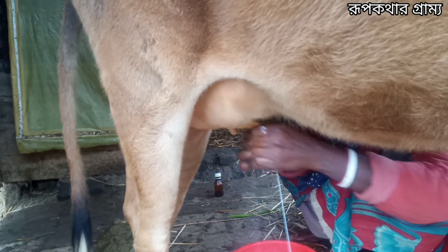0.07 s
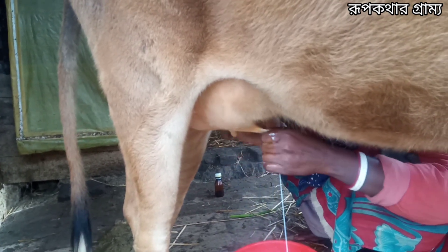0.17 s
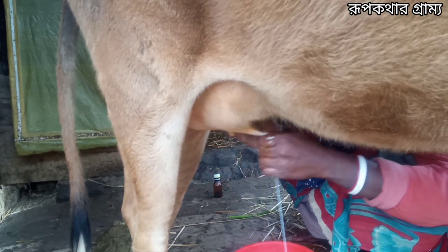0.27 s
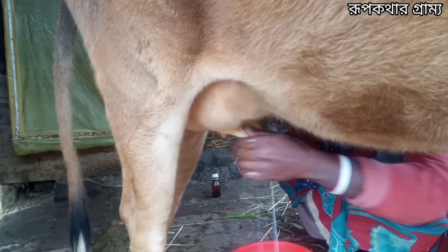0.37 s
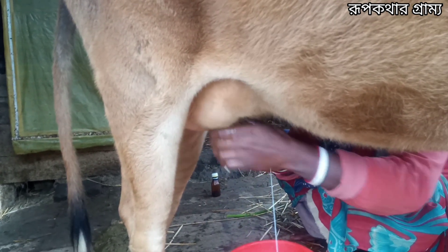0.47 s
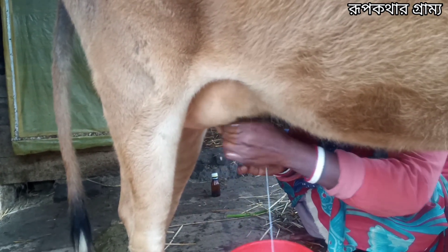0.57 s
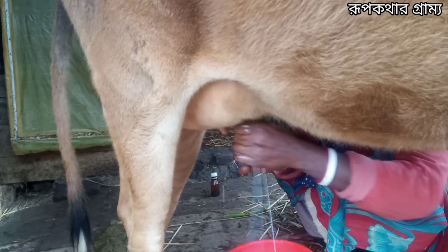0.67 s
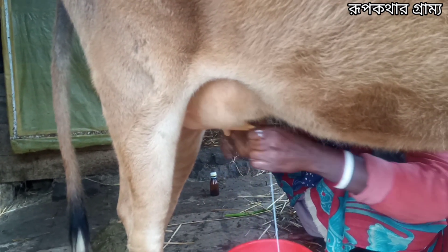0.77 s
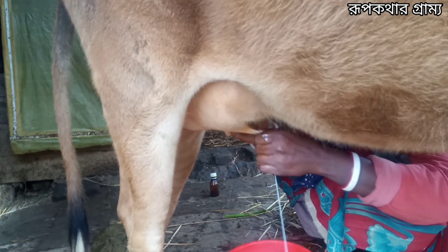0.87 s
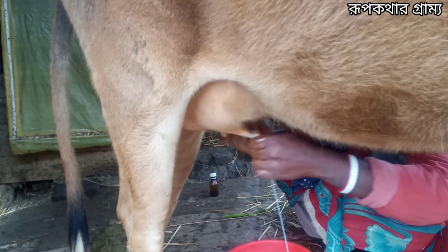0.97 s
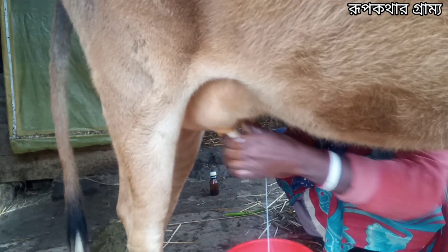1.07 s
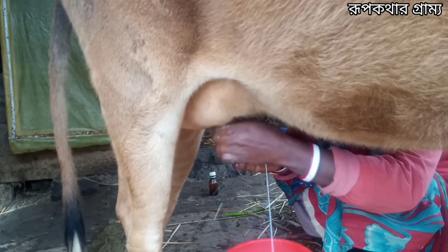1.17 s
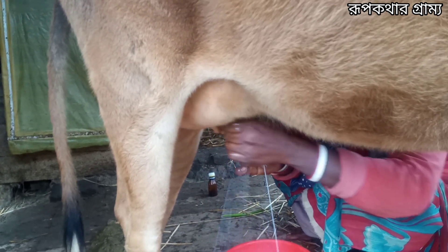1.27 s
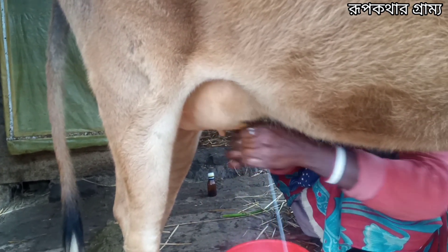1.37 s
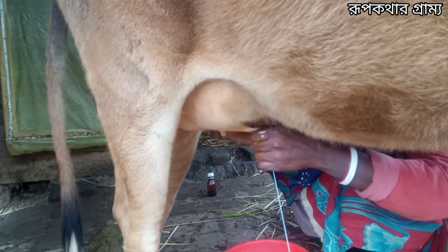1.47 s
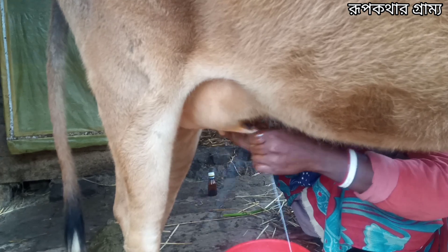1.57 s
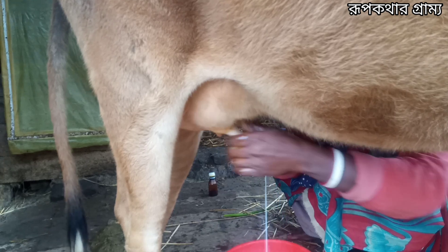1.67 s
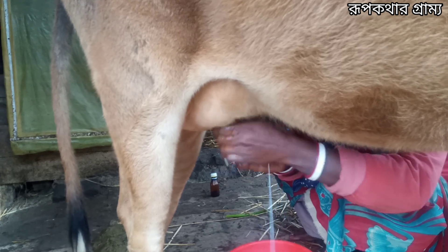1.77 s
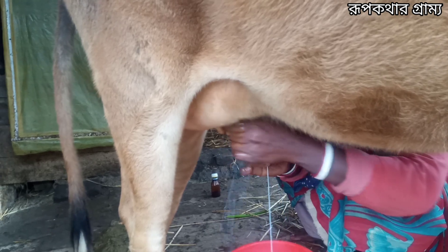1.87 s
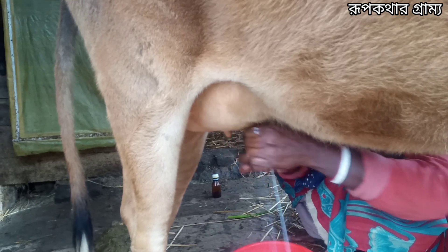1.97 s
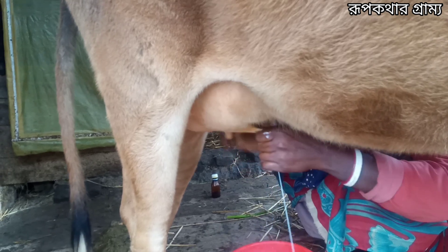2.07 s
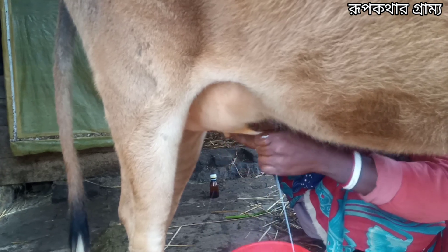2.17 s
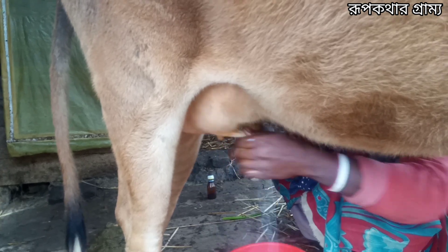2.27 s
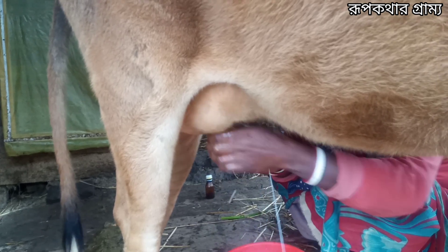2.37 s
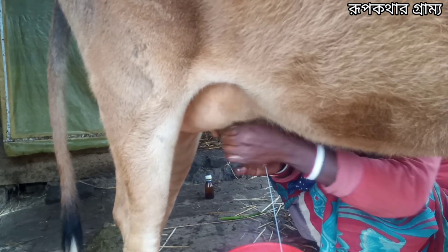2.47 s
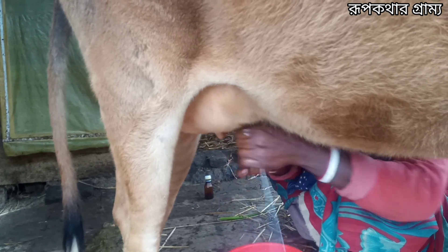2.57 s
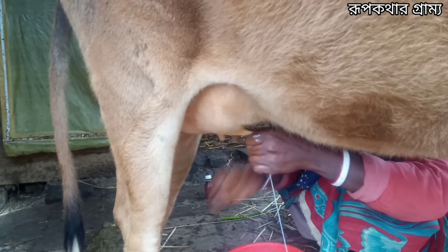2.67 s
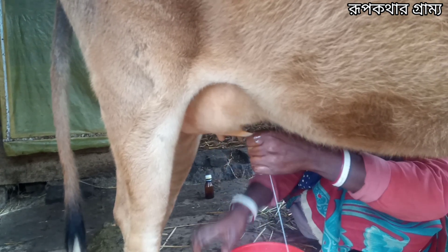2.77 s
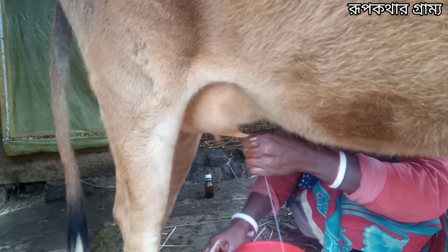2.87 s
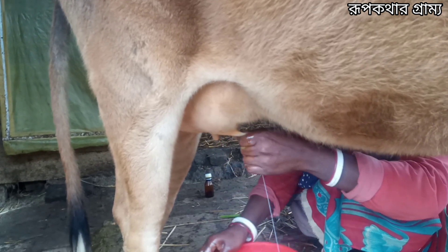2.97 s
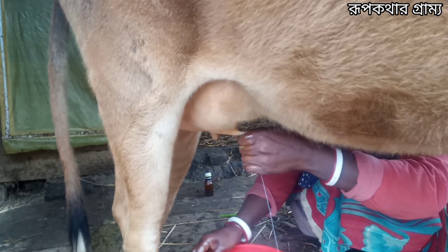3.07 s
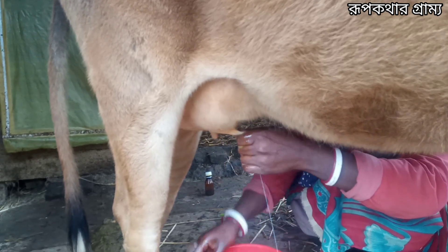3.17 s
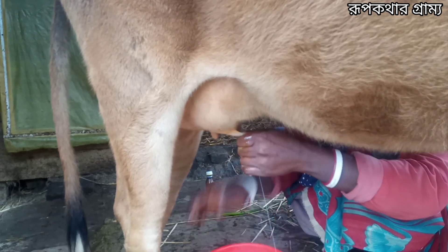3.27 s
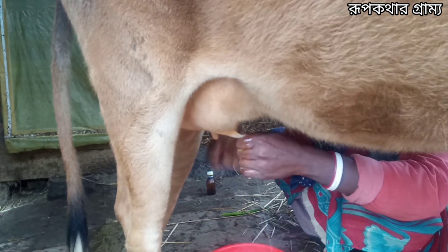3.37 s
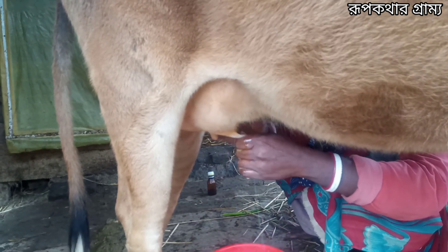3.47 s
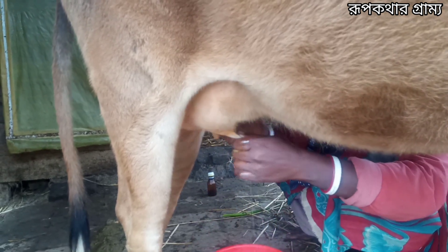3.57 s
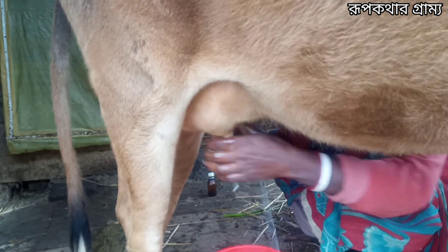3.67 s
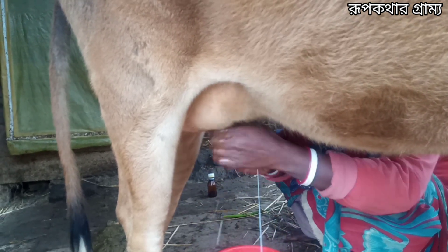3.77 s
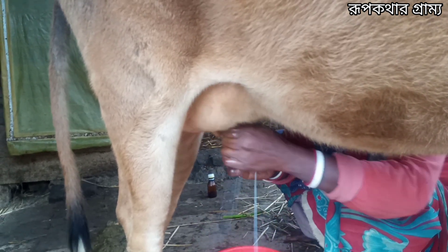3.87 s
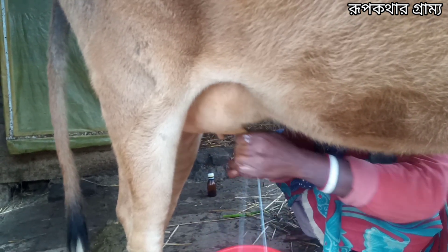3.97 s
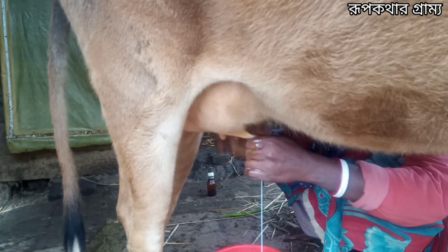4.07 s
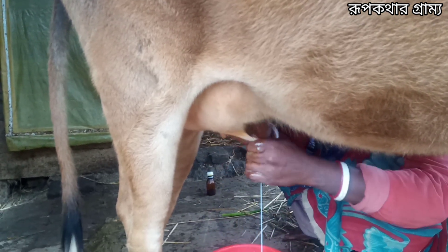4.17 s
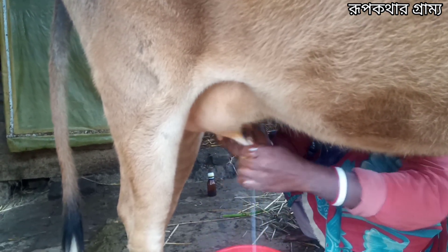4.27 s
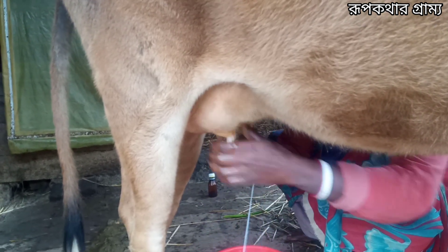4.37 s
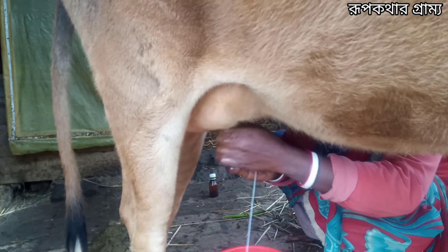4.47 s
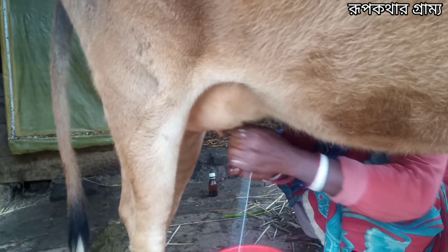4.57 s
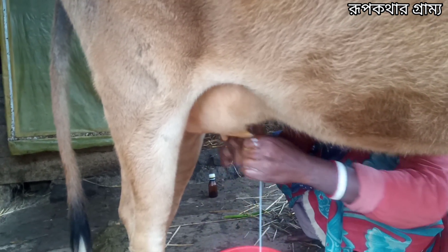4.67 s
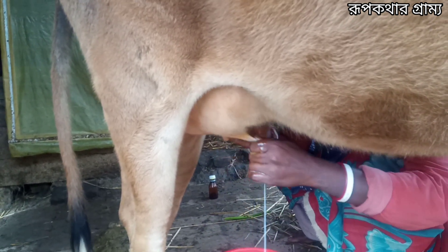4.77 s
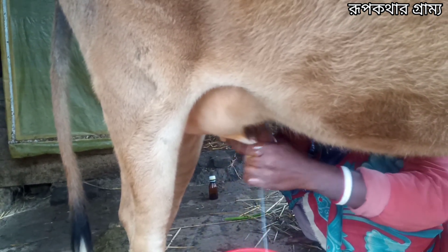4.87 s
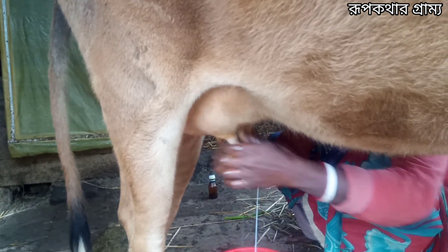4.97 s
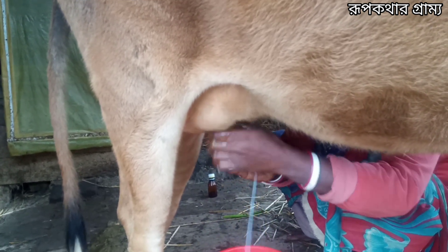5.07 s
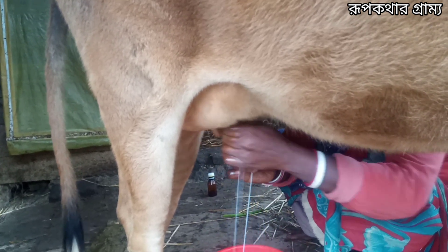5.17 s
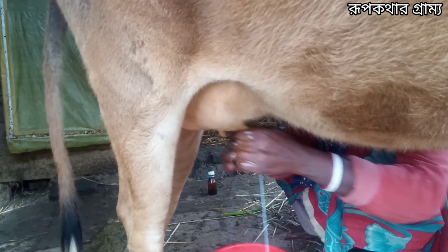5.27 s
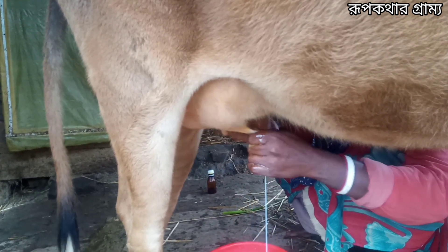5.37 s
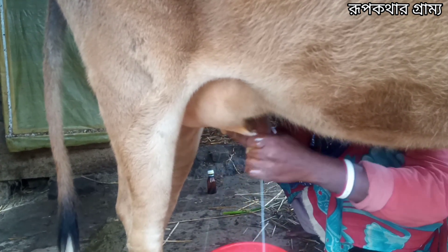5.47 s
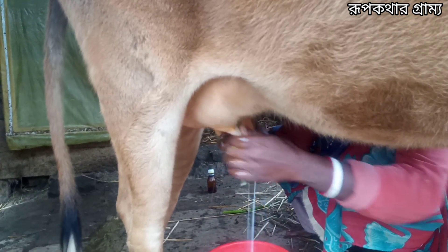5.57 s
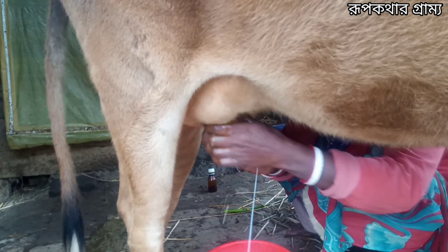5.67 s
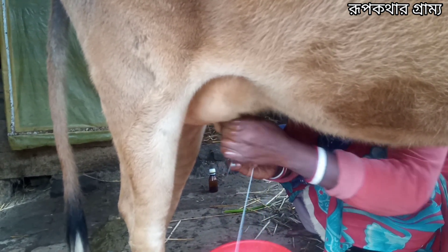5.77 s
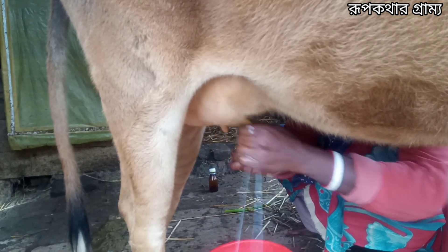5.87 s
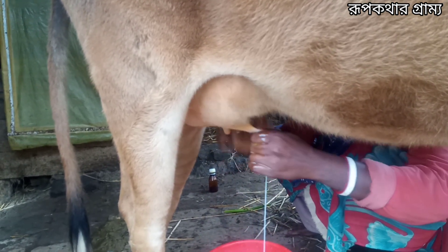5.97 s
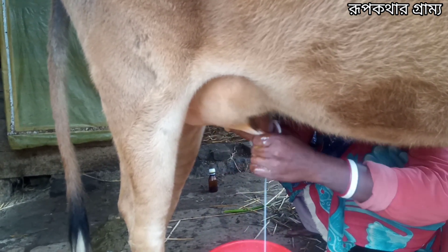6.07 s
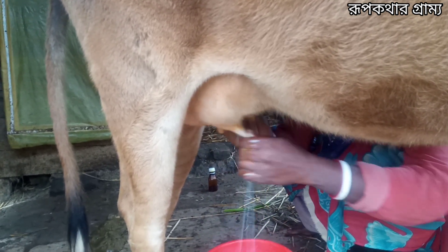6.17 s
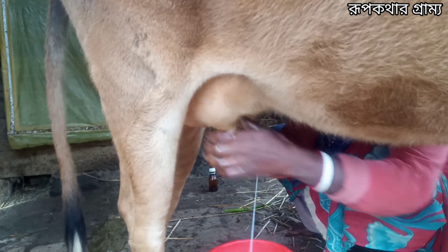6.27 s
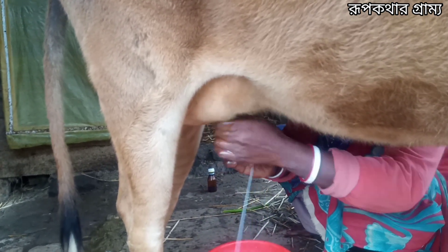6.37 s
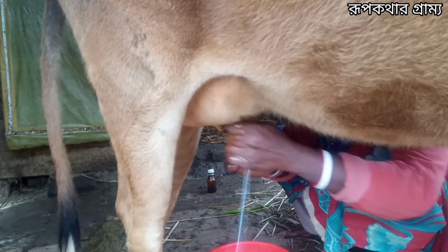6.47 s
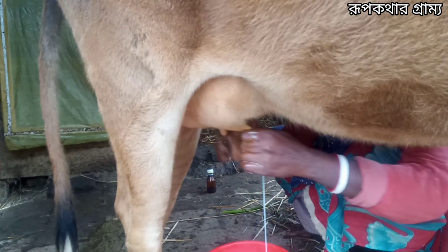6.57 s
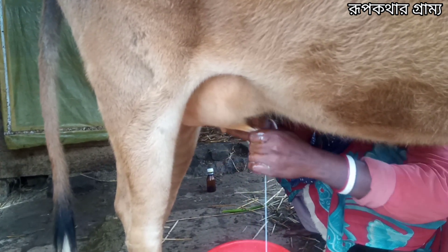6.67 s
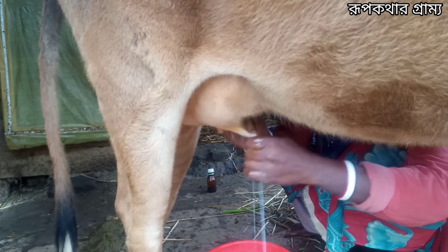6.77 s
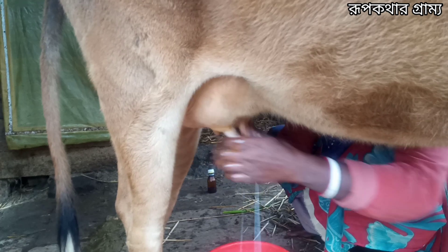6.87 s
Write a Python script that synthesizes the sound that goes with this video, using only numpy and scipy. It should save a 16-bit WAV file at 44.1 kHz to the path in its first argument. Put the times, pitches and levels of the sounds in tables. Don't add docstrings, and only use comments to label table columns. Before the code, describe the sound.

Close phone microphone in a quiet outdoor yard. Milk squirts about three times a second into a froth-filled plastic bucket, each rush foamy, hissing and slightly hollow. Near the middle the jets weaken, a hand knocks the bucket twice, and a few drops tick while a faint bird whistles far off. The steady squirting then returns, with wet slaps and a slight puff of wind late on.

```python
import sys
import numpy as np
from scipy import signal
from scipy.fft import rfft, irfft
from scipy.io import wavfile
from scipy.ndimage import uniform_filter1d

SR = 44100
rng = np.random.default_rng(int(sys.argv[2]) if len(sys.argv) > 2 else 0)


def persist_wave(psi):
    counts = np.round(np.clip(psi, -1, 1) * 32767).astype(np.int16)
    wavfile.write(sys.argv[1], SR, np.atleast_2d(counts).T)


def amplitude_ratio(level_db):
    exponent = np.asarray(level_db, float) / 20
    return 10 ** exponent


N = 305172
T = np.arange(N) / SR

# (time [s], swell [s], squeeze [s], hiss level [dB])
TEAT_JETS = [(-0.106, 0.047, 0.18, -52), (0.074, 0.093, 0.2, -43.0), (0.417, 0.04, 0.2, -38.5),
             (0.735, 0.1, 0.19, -40), (1.044, 0.17, 0.2, -36), (1.373, 0.11, 0.19, -37.5),
             (1.712, 0.03, 0.14, -36), (1.95, 0.21, 0.236, -40.5), (2.352, 0.036, 0.14, -39),
             (2.625, 0.028, 0.028, -51), (2.73, 0.017, 0.13, -53.2), (2.944, 0.097, 0.13, -46.5),
             (3.758, 0.043, 0.21, -46.5), (3.967, 0.048, 0.31, -49.5), (4.378, 0.03, 0.22, -40.5),
             (4.637, 0.08, 0.23, -42.5), (4.992, 0.044, 0.19, -40.5), (5.269, 0.089, 0.2, -40),
             (5.6, 0.14, 0.21, -39.5), (5.934, 0.012, 0.2, -46), (6.257, 0.072, 0.15, -38),
             (6.502, 0.11, 0.27, -41), (6.876, 0.052, 0.037, -42.8)]
# (time [s], level [dB], upper modes re lower [dB])
BLOWS = [
    (2.9526, -31.5, -10),
    (2.973, -16, -10),
    (2.9777, -29.5, 5),
    (3.2343, -20.5, -3.5),
]


def evened(x):
    return x / np.sqrt(np.mean(x ** 2) + 1e-20)


def add(mix, s, sound):
    part = mix[round(s * SR):][:len(sound)]
    part += sound[:len(part)]


def coloured(x, points):
    hz, db = np.transpose(points)
    bins = np.fft.rfftfreq(len(x), 1 / SR)
    gain = amplitude_ratio(np.interp(np.log(bins + 1), np.log(hz), db))
    return evened(irfft(rfft(x) * gain, len(x)))


def resonate(x, hz, width):
    turn = np.exp(2j * np.pi * np.cumsum(hz * np.ones(len(x))) / SR)
    r = np.exp(-np.pi * width / SR)
    return 2 * (turn * signal.lfilter([1 - r], [1, -r], x / turn + 1e-18)).real


def ring(x, modes):
    out = np.zeros(len(x))
    for k, (hz, width, db) in enumerate(modes):
        near, far = np.exp((2j * hz - width * np.array([1, 1.3])) * np.pi / SR)
        gain = (1 - abs(near)) * (1 - abs(far))
        out += (-1) ** k * amplitude_ratio(db) * signal.lfilter([gain], np.poly([near, far]), x).real
    return evened(out)


def flutter(per_s):
    return evened(signal.lfilter(*signal.butter(1, 2 * per_s / SR), rng.standard_normal(N)))


def patchy(x, patch_db, size=(4, 14)):
    z = signal.stft(x, nperseg=512, noverlap=384)[2]
    field = rng.standard_normal(z.shape[::-1]).T
    field = uniform_filter1d(field, size=size[0], axis=0)
    field = evened(uniform_filter1d(field, size=size[1], axis=1))
    return evened(signal.istft(z * amplitude_ratio(patch_db * field), nperseg=512, noverlap=384)[1][:N])


def squeezes(rows, gain_db, follow=1.0, onset=0.65, sag_db=63, cut_db=340, drip=0.37, drip_db=25, head_db=0):
    usual_db, head_s = -25, 0.017
    power = np.zeros(N)
    for (s, swell, length, db), wet in zip(rows, drip * np.ones(len(rows))):
        u = np.maximum(T - s, 0)[max(round(s * SR), 0):][:SR]
        after = np.maximum(u - length, 0)
        share = np.clip(wet, 0, 1)
        shape = np.minimum(u / swell, 1) ** onset * amplitude_ratio(-sag_db * np.maximum(u - swell, 0))
        shape = shape * ((1 - share) * amplitude_ratio(-cut_db * after) + share * amplitude_ratio(-drip_db * after))
        shape = shape * amplitude_ratio(head_db * np.clip((head_s - u) / 0.002, 0, 1))
        level = amplitude_ratio(gain_db + usual_db + follow * (db - usual_db))
        add(power, max(s, 0), (level * shape) ** 2)
    return np.sqrt(power)


def bubbles(lo_hz, hi_hz, per_s, cycles, spread_db, count=24):
    out = np.zeros(N)
    t = np.arange(700) / SR
    for hz in np.geomspace(lo_hz, hi_hz, count):
        tone = np.sin(2 * np.pi * hz * t * (1 + 0.01255 * hz * t))
        ping = tone * np.exp(-t * hz / cycles) * np.sqrt(hz)
        hit, size = rng.random(N), rng.exponential(1, N)
        train = (hit < per_s / count / SR) * amplitude_ratio(spread_db * np.minimum(size, 4))
        out += signal.oaconvolve(train, ping)[:N]
    return evened(out)


def droplets(share, spread_db):
    size_db = spread_db * np.minimum(rng.exponential(1, N), 6) * (rng.random(N) < share)
    return patchy(rng.standard_normal(N) * amplitude_ratio(size_db + 3.83 * flutter(127)), 3.8)


def milk():
    # (time [s], swell [s], squeeze [s], peak level [dB], aim: bucket air re froth [dB])
    full_jets = [(-0.101, 0.025, 0.091, -23, 0), (0.072, 0.19, 0.23, -31, 0.5),
                 (0.447, 0.073, 0.27, -22.5, -6), (0.753, 0.12, 0.17, -25.5, -0.5),
                 (1.098, 0.062, 0.19, -20.5, -2), (1.373, 0.13, 0.19, -28, -5.5),
                 (1.737, 0.037, 0.22, -20.5, -4.5), (1.991, 0.21, 0.17, -26.5, -8),
                 (2.366, 0.046, 0.18, -26.5, 0.5), (2.617, 0.052, 0.047, -40.5, -10),
                 (2.717, 0.13, 0.098, -34, -10.5), (2.958, 0.013, 0.11, -36.5, -7),
                 (3.761, 0.096, 0.2, -32, -0.5), (4.012, 0.14, 0.3, -30.5, 0.5),
                 (4.401, 0.14, 0.13, -23, -10.5), (4.686, 0.1, 0.18, -25.5, -4),
                 (5.011, 0.045, 0.15, -19, -5), (5.295, 0.13, 0.23, -29.5, -0.5),
                 (5.631, 0.075, 0.16, -22, -8), (5.967, 0.1, 0.18, -24, -4),
                 (6.298, 0.062, 0.11, -20, -10.5), (6.589, 0.067, 0.21, -23.5, -2),
                 (6.893, 0.065, 0.042, -28.5, -3.5)]
    # (time [s], swell [s], squeeze [s], peak level [dB], air re froth [dB])
    spurts = [(4.415, 0.018, 0.043, -32.5, -13), (4.655, .02, .04, -45, 0), (5.225, 0.012, 0.027, -42, -10),
              (5.69, .02, 0.034, -22, -22), (5.775, .015, 0.039, -27.5, -20),
              (5.935, .01, 0.035, -45.5, -7), (6.06, 0.03, 0.026, -25.5, -9),
              (6.515, 0.033, 0.076, -42.5, -14)]
    strike_db = [-39, -43, -35, -36, -35.5, -65, -37.5, -65, -39, -50, -54, -67, -47, -39.5, -42.5, -44,
                 -42.5, -39.5, -43, -46.5, -45.5, -40.5, -36.5]
    jet_bubble_hz = [2840, 2740, 2670, 2750, 2560, 2600, 2600, 3070, 2980, 3030, 2170, 2600, 2850, 3040,
                     2700, 2660, 2380, 2900, 2650, 2730, 2600, 3100, 3060]
    # (time [s], frequency [Hz])
    column = [(0, 1135), (1.5, 1228), (1.72, 1090), (2.0, 1130), (2.35, 1093), (2.9, 1160), (3.8, 1215),
              (6.92, 1203)]
    # (frequency [Hz], width [Hz], level [dB])
    wall_modes = [(343, 54, -11.5), (421.2, 40, -5.5), (473.7, 43, -4.5), (682, 210, 1)]
    air_modes = [(1028, 158, 3.5), (1209.6, 123, -1.5), (1484, 340, 3)]
    froth_modes = [(1636, 410, -7), (2042, 286, -1), (2430, 365, -2), (2866, 1110, -4.5), (3815, 1760, -1),
                   (4216, 1020, -9)]
    # (frequency [Hz], level [dB per Hz])
    spray_colour = [(900, -58), (2710, -10), (4600, -5), (5400, -6.5), (6670, 0), (7440, -1), (9200, -16),
                    (12000, -25), (20200, -120)]

    rows, main = np.array(full_jets + spurts), len(full_jets)
    jets, aim_db = rows[:, :4], rows[:, 4:]
    wet = amplitude_ratio(1.1 * aim_db[:, 0])
    head_db = -2.5

    flow = squeezes(jets, 0.12, drip=0.63 * wet, head_db=head_db)
    hollow = squeezes(jets + aim_db * [0, 0, 0, 1], 0.044, onset=0.45, sag_db=66.5, cut_db=310,
                      drip=0.74 * wet, drip_db=7, head_db=head_db)
    drone = squeezes(np.c_[jets[:main, :3], strike_db], -5.6, onset=0.12, sag_db=12, cut_db=190,
                     drip=3.2 * wet[:main], drip_db=36)
    belly = squeezes(jets, -20.5, follow=0.31, onset=0.28, sag_db=25.5, cut_db=290,
                     drip=1.6 * wet * wet, drip_db=41)
    landing_mist = squeezes(jets, -9, follow=0.71, onset=0.65, sag_db=64, cut_db=350,
                            drip=0.53 * wet, drip_db=33, head_db=head_db)
    teat_mist = squeezes(TEAT_JETS, 1.33, onset=0.73, sag_db=-10, cut_db=222, drip=0.2, drip_db=90)
    mist = np.hypot(landing_mist, teat_mist)

    foam = bubbles(353.6, 5030, 5000, 3.43, 1.67, count=14)
    foam = foam + 0.93 * bubbles(895.7, 4613, 900, 18.7, 3.7, count=12)
    drive = patchy(foam + 2.2 * rng.standard_normal(N), 2.17)
    drive = patchy(drive, 2.4, size=(2, 40))

    spent_hz = 2320
    full_hz = np.interp(T, jets[:main, 0] + jets[:main, 1], jet_bubble_hz)
    bubble_hz = spent_hz + (full_hz - spent_hz) * np.tanh(flow / amplitude_ratio(-29.5))
    froth = ring(drive, froth_modes)
    froth = evened(froth + 1.68 * resonate(froth, bubble_hz, 860))
    air = ring(drive, air_modes)
    air = evened(air + 2.6 * resonate(air, np.interp(T, *np.transpose(column)), 78))
    wall = ring(drive, wall_modes[:3])
    unshifted = T < BLOWS[1][0]
    wall = evened(wall + 0.36 * unshifted * resonate(wall, 395, 33))
    spray = coloured(droplets(0.032, 3.6), spray_colour)
    spray = spray * amplitude_ratio(1.25 * flutter(56))

    breakup = evened(amplitude_ratio(0.71 * flutter(22)))
    mix = flow * froth + hollow * air
    mix = mix + drone * wall * amplitude_ratio(1.74 * flutter(10))
    mix = mix - belly * ring(drive, wall_modes[3:])
    return (mix + mist * spray) * breakup


def splats():
    # (time [s], level [dB], centre [Hz])
    wet_hits = [(0.769, -10, 2060), (1.119, -28, 1200), (1.7514, -8, 1110), (2.008, -13, 2170),
                (2.666, -14, 3800), (3.6164, -30.5, 3850), (3.774, -13.5, 1150), (4.6006, -8.5, 3500),
                (4.7015, -18, 1160), (5.02, -6.5, 1280), (5.1606, -5, 3200), (5.646, -1.5, 2530),
                (5.938, -32, 1140), (5.9688, -24, 1150), (5.9895, -4.5, 2900)]
    out, t = np.zeros(N), T[:2500]
    for (s, db, hz), puff in zip(wet_hits, rng.standard_normal((len(wet_hits), len(t)))):
        burst = evened(resonate(resonate(puff, hz, 660), hz, 1800))
        add(out, s, amplitude_ratio(db - 19 - 60 * t / 0.051) * burst * np.minimum(t / 0.00033, 1))
    return out


def bucket(x):
    t = T[:3000]
    tail = rng.standard_normal(len(t)) * amplitude_ratio(-60 * t / 0.058) * (t > 0.0015)
    return x + amplitude_ratio(-10.5) * signal.oaconvolve(x, tail / np.linalg.norm(tail))[:N]


def teat():
    # (frequency [Hz], level [dB per Hz])
    hiss_colour = [(2000, -70), (5000, -2), (8000, 5), (9500, 1), (12000, 0.5), (15400, 1.5), (16000, -29)]
    hiss = coloured(droplets(0.012, 4.7), hiss_colour)
    return hiss * squeezes(TEAT_JETS, 0.11, onset=0.41, sag_db=8.5, cut_db=220, drip=0.23, drip_db=95)


def knocks():
    # (frequency [Hz], level [dB], t60 [s])
    lower_modes = [(132, -15.5, 0.1), (187, -28, 0.28), (231, -17, 0.17), (289, -13.5, 0.18),
                   (349, -7.5, 0.15), (363, -13, 0.33), (397.3, -2, 0.14), (385, -7, 0.26),
                   (420, -14.5, 0.32)]
    upper_modes = [(500, -14, 0.17), (570, -7.5, 0.076), (650, -24, 0.32), (670, -25, 0.064),
                   (985, -7, 0.08), (1220, -10.5, 0.12), (1880, -6.5, 0.031)]
    # (time [s], level [dB], centre [Hz], t60 [s])
    skin_slaps = [
        (2.9526, -10, 2200, 0.01),
        (2.9784, -21, 2110, 0.046),
        (3.2339, -33, 700, 0.15),
        (3.242, -41, 1870, 0.1),
    ]
    out, t = np.zeros(N), T[:SR // 2]

    def struck(modes):
        return sum(amplitude_ratio(db - 60 * t / t60) * np.sin(2 * np.pi * hz * t) for hz, db, t60 in modes)

    lower, upper = struck(lower_modes), struck(upper_modes)
    rise = np.minimum(t / 0.0017, 1)
    for s, db, upper_db in BLOWS:
        add(out, s, amplitude_ratio(db) * (lower + amplitude_ratio(upper_db) * upper) * rise)
    for (s, db, hz, t60), puff in zip(skin_slaps, rng.standard_normal((len(skin_slaps), len(t)))):
        slap = evened(resonate(resonate(puff, hz, 0.29 * hz), hz, 2.6 * hz))
        add(out, s, slap * amplitude_ratio(db - 60 * t / t60) * rise)
    return out


def ticks():
    # (time [s], level [dB], centre [Hz], t60 [s])
    drops = [(0.102, -26, 10100, 0.041), (0.127, -25, 7480, 0.03), (1.056, -25, 6690, 0.016),
             (1.41, -43, 7580, 0.02), (2.6523, -22.5, 7560, 0.026), (2.668, -24.5, 7270, 0.024),
             (2.813, -43, 6610, 0.03), (2.878, -24, 12700, 0.027), (2.881, -28, 7080, 0.022),
             (2.952, -26, 7150, 0.028), (2.9781, -35, 7430, 0.03), (3.243, -45, 7350, 0.03),
             (3.275, -47, 7260, 0.03), (3.3927, -31.5, 13500, 0.027), (3.494, -36.5, 9660, 0.038),
             (3.5713, -44, 13200, 0.037), (3.617, -26.5, 9900, 0.036), (3.7264, -68, 7210, 0.027),
             (3.794, -24, 7360, 0.03), (3.8771, -24, 6990, 0.03), (4.0148, -22.5, 7340, 0.03),
             (4.1127, -17, 6260, 0.06), (4.3834, -23, 8400, 0.022), (4.5994, -44, 6010, 0.03),
             (4.7006, -22, 7970, 0.026), (5.9044, -50, 7060, 0.03), (5.917, -47, 6960, 0.024),
             (5.938, -29.5, 6610, 0.03)]
    out, t = np.zeros(N), T[:4000]
    high = signal.butter(8, 5500, "high", fs=SR, output="sos")
    for (s, db, hz, t60), puff in zip(drops, rng.standard_normal((len(drops), len(t)))):
        burst = evened(signal.sosfilt(high, resonate(puff, hz, 930) + 0.24 * puff))
        fade = amplitude_ratio(-60 * t / t60) + 0.21 * amplitude_ratio(-60 * t / 0.14)
        add(out, s, amplitude_ratio(db - 10.0) * burst * fade)
    return out


def bird():
    # (time [s], frequency [Hz], level [dB])
    chirps = [
        [(3.25, 2560, -64), (3.29, 2580, -60), (3.33, 2680, -66), (3.365, 2780, -59), (3.41, 2950, -69)],
        [(3.27, 3300, -69), (3.32, 3650, -59), (3.355, 3550, -71), (3.4, 3850, -61), (3.44, 4300, -66)],
    ]
    out = np.zeros(N)
    for rows in chirps:
        s, hz, db = np.transpose(rows)
        t = np.arange(s[0], s[-1], 1 / SR)
        tone = evened(resonate(rng.standard_normal(len(t)), np.interp(t, s, hz), 140))
        add(out, s[0], tone * amplitude_ratio(3.0 + np.interp(t, s, db)) * signal.windows.tukey(len(t), 0.2))
    return out


def wind():
    # (time [s], peak level [dB], rise and fall [dB per s])
    puffs = [(2.93, -56, 250), (4.75, -59, 92), (5.8, -56.5, 92), (6.44, -52, 120), (6.52, -45.5, 122),
             (6.6, -52.5, 160), (6.89, -51, 400)]
    colour = [(40, -32), (110, -3.5), (200, 3), (320, 4.5), (600, -29)]  # (Hz, dB)
    lumps = coloured(rng.standard_normal(N) * amplitude_ratio(4.8 * flutter(25)), colour)
    return lumps * sum(amplitude_ratio(db - fall_db * abs(T - s)) for s, db, fall_db in puffs)


def yard():
    # (frequency [Hz], level [dB per Hz])
    air_colour = [(15, -53), (25, -29), (64, -3.5), (119, -3.5), (204, -1), (314, -2.5), (668, -9.5),
                  (1060, -12.5), (1240, -11), (1500, -14.5), (2020, -14), (3180, -10.5), (4900, -23.5),
                  (6950, -17), (15600, -36)]
    level_db = -58 + 0.5 * flutter(6.1)
    return amplitude_ratio(level_db) * coloured(patchy(rng.standard_normal(N), 2.7), air_colour)


def scene():
    slaps = signal.sosfilt(signal.butter(4, 650, "high", fs=SR, output="sos"), splats())
    jets = signal.sosfilt(signal.butter(4, 310, "high", fs=SR, output="sos"), milk())
    return (bucket(jets + slaps) + teat() + knocks() + ticks() + bird() + wind() + yard())[None]


def low_pass(x):
    return signal.sosfilt(signal.butter(12, 16470, fs=SR, output="sos"), x)


def record(dry):
    rounded = 0.63 * np.tanh(dry / 0.61)
    thin = signal.sosfilt(signal.butter(3, 50, "high", fs=SR, output="sos"), rounded)
    edge = signal.firwin(601, 15650, window=("kaiser", 8), fs=SR)
    return low_pass(signal.oaconvolve(thin, edge[None], "same"))


dry = scene()
out = record(dry)
persist_wave(out)
```